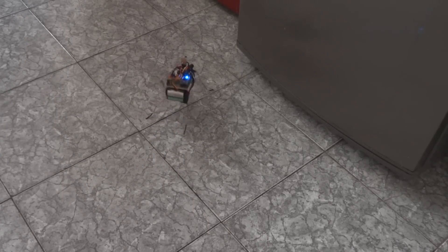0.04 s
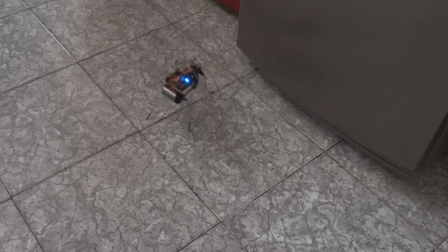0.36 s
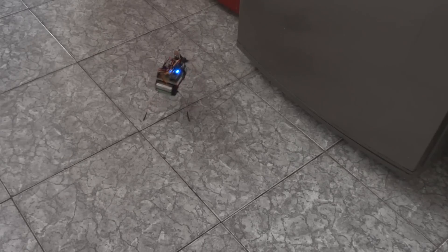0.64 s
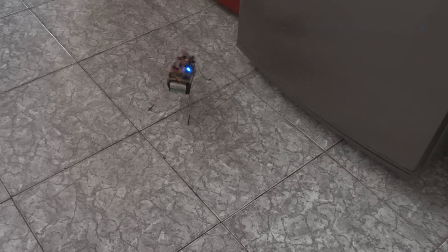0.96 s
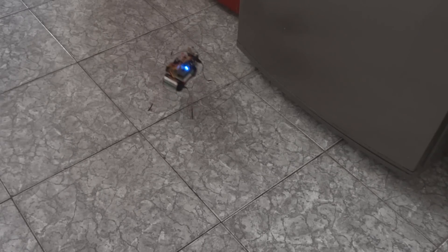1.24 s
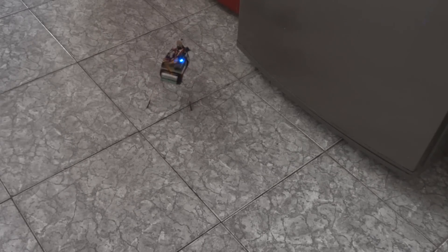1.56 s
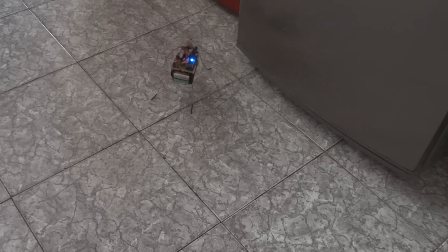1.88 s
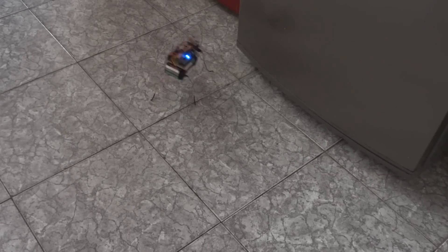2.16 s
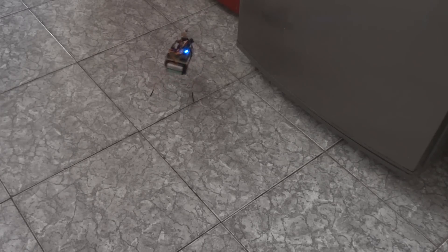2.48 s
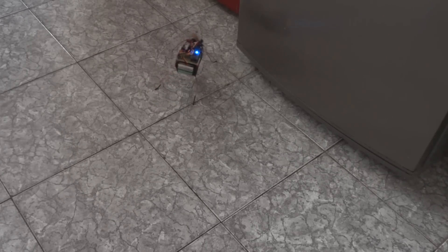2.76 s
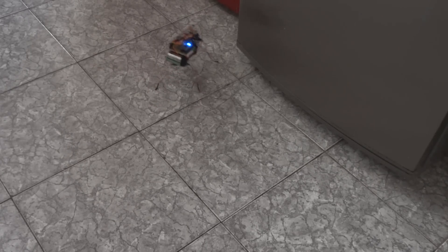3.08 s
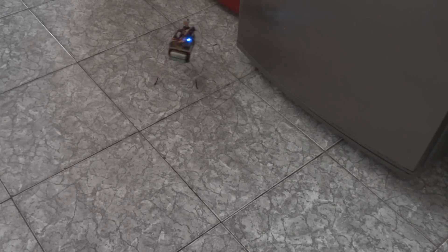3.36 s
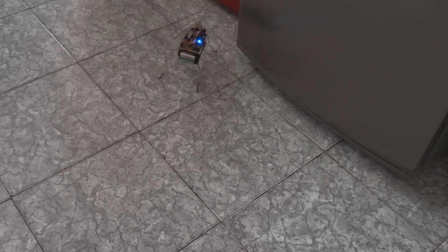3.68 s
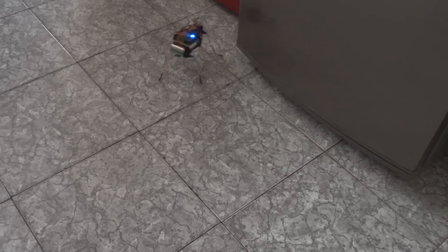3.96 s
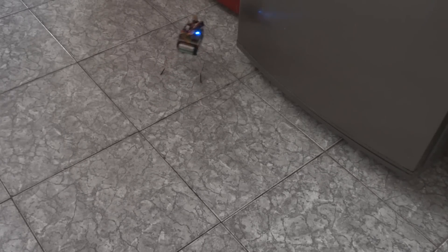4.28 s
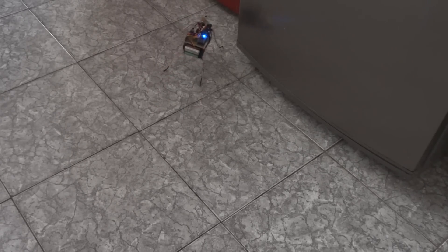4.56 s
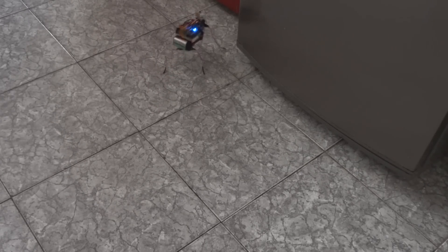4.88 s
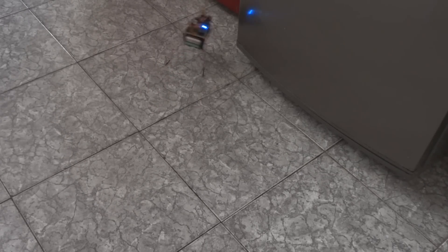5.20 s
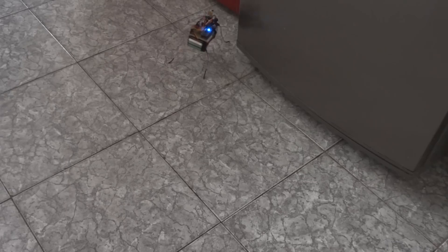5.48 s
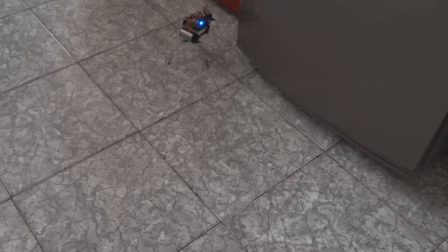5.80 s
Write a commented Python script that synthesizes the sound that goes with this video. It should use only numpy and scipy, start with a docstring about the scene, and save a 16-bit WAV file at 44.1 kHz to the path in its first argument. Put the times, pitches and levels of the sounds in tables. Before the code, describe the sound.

A little legged robot walks steadily over a tiled floor. Its small servo motors alternate between a clear, high whine and a rougher, hissing gear chatter, about two swings a second, each ending in a tiny chirp. The feet tap softly and sometimes scuff, and a leg clacks once late on. The microphone is fairly near, in a small room with quiet background air and a faint low hum.

```python
"""A little legged robot walks over a tiled floor, its servos taking turns: a clear whining lean,
then a rougher, hissing stride, each about 0.45 s long. Meshing gears sing, loose teeth rattle the
case, motor brushes hiss, and each swing brakes with a chirp. The feet tap and scuff the tiles
in a small room; behind are room noise, a low rumble and hum, and one faint far-off tone."""
import sys
import numpy as np
from scipy import signal
from scipy.fft import rfft, irfft, next_fast_len
from scipy.io import wavfile
from scipy.ndimage import uniform_filter1d

SR = 44100
rng = np.random.default_rng(int(sys.argv[2]) if len(sys.argv) > 2 else 0)


def store_pcm(level_fs):
    """Save levels as 16-bit WAV."""
    pcm = np.round(np.clip(level_fs, -1, 1) * 32767).astype(np.int16)
    wavfile.write(sys.argv[1], SR, np.atleast_2d(pcm).T)


N = 266364
TIME = np.arange(N) / SR
IDLE_HZ = 827.4  # motor speed as a lean starts and a stride ends; speeds are the basic gear order


def servos(coast_from_s=.3):
    """Leans and strides in turn, each braked at its end."""
    # leans: start t/s, spun-up f/Hz, crest after t/s, crest f/Hz, dip f/Hz,
    # then trims: whine level/dB, chatter level/dB, hiss level/dB
    leans = [(-.3, 980, .17, 1040, 980, 2, 1.5, 0.5), (.59, 930, 0.15, 1013, 960, 1, 1.5, 0.5),
             (1.46, 972, .17, 1035, 985, 1, 1, 1.5), (2.341, 954, 0.17, 1039, 1030, -3.5, 0.5, 0.5),
             (3.21, 958.6, .12, 980, 985, 1.5, 0.5, -0.5), (4.1, 1022, .17, 1033, 988, -3.5, 0.5, -0.5),
             (4.98, 1016, .15, 1041, 988, -0.5, 0.5, 0), (5.86, 1030, .12, 1046, 1008, -0.5, -0.5, 1.5)]
    # strides: start t/s, kick f/Hz, sag after t/s, sag f/Hz, rebound after t/s, rebound f/Hz,
    # late f/Hz, then trims: whine level/dB, chatter level/dB, hiss level/dB, load level/dB
    strides = [(.1, 1268, .175, 999, .235, 985, 949, -1, -1.5, 0.5, -1.5),
               (.98, 1243, 0.16, 1003, 0.22, 978, 939, 1, -1, -1, 0),
               (1.86, 1209, 0.15, 999, .26, 989, 938, -2, -0.5, -1, 1.5),
               (2.74, 1095, 0.14, 915, .26, 1062, 1035, -1.5, 1.5, -0.5, -1.5),
               (3.62, 1188, .14, 931, .25, 1007, 948, -1.5, 1, -1.5, -2.5),
               (4.5, 1174, 0.17, 934, .25, 1006, 912, -3, 1.5, -1.5, 0.5),
               (5.38, 1153, .14, 907, 0.24, 1048, 953, 2, 1.5, 0, -1.5)]
    # ends of the swings: t/s, racing level/dB, braking level/dB
    stops = [(.03, -49, -44), (.52, -55, -52), (.92, -46, -41), (1.385, -52, -49), (1.795, -50, -46),
             (2.27, -55, -53), (2.672, -42, -40), (3.13, -52, -55), (3.55, -44, -43), (4.03, -52, -48),
             (4.437, -40, -42), (4.89, -56, -57), (5.315, -50, -42), (5.79, -55, -56)]
    out = np.zeros(N)
    for start, *row in leans:
        add(out, start, lean(*row))
    for start, *row in strides:
        add(out, start, stride(*row))
        add(out, start + coast_from_s, coast())
    for row in stops:
        add(out, *brake(*row))
    return out


def lean(spun_hz, crest_s, crest_hz, dip_hz, whine_db, chatter_db, hiss_db):
    """The clear swing: the motor spins up to a crest, dips as the weight shifts, races to its stop."""
    # envelopes before trims: t/s, whine level/dB, chatter level/dB, frame load level/dB,
    # hiss level/dB, backlash roughness/0-1
    swing = [(0, -66, -55, -4, -69, 0.5), (.03, -55.5, -50.5, -5.5, -64, 0.33),
             (0.102, -47.5, -48.5, -4, -58, 0), (0.219, -47.5, -46.5, -7.5, -60.5, 0.03),
             (.29, -55, -47.5, -4.5, -52, 0.78), (0.351, -48.5, -49.5, -14.5, -58.5, 0.52),
             (.4, -63, -58, -21, -68, 1.14)]
    # colour of the gear case: f/Hz, level/dB
    case = [(1000, -23.5), (2700, -24), (3050, -25), (3400, -8.5), (4000, -7.5), (4500, -4.5), (5500, 15),
            (6300, 7.5), (7000, 11), (7700, 6.5), (8300, 6), (9700, -0.5), (16000, -22)]
    speeds = [(0, IDLE_HZ), (.05, spun_hz), (crest_s, crest_hz),
              (crest_s + .03485, dip_hz), (.26, dip_hz),
              (.315, 1120), (swing[-1][0], 916)]  # races, then brakes
    trims_db = (whine_db + .5, chatter_db + .5, 1, hiss_db + 1)
    return servo_swing(speeds, trims_db, swing, case, chatter_db_per_hz=.0268, flutter=.00796,
                       jitter_rad=.045, blur_rad=.29, twin_lead=.035, twin_db=-1.5, wobble=.25)


def stride(kick_hz, sag_s, sag_hz, rebound_s, rebound_hz, late_hz,
           whine_db, chatter_db, hiss_db, load_db):
    """The rough swing: the motor kicks off fast, sags as the leg takes the load, rebounds, runs down."""
    # envelopes before trims: t/s, whine level/dB, chatter level/dB, frame load level/dB,
    # hiss level/dB, backlash roughness/0-1
    swing = [(0, -53, -64, -20, -62, .93), (0.036, -50.5, -53.5, -8.5, -50, 0.98),
             (.1, -49.5, -48, 3, -48, 0.23), (.16, -45, -51, 4, -48, 0.24),
             (.25, -46.5, -52, 5.5, -46, 0.17), (.31, -50, -49.5, 3.5, -46, 0.52),
             (.4, -57, -49, -5, -52.5, .85), (.44, -63, -54, -3, -60, .85),
             (0.482, -70, -50.5, -18, -69, 0.82)]
    # colour of the gear case: f/Hz, level/dB
    case = [(1000, -36), (2650, -26), (3250, -1.5), (4100, 1.5), (4500, 1.5), (5500, 11.5), (6200, 5.5),
            (7000, 7.5), (7700, -2.5), (8300, 4.5), (9600, -4.5), (12000, -14), (16000, -41)]
    speeds = [(.025, kick_hz), (sag_s, sag_hz), (rebound_s, rebound_hz),
              (.32, late_hz), (swing[-1][0], IDLE_HZ)]
    trims_db = (whine_db - .5, chatter_db - .5, load_db, hiss_db + 1)
    return servo_swing(speeds, trims_db, swing, case, chatter_db_per_hz=.052, flutter=.00843,
                       jitter_rad=.053, blur_rad=.22, twin_lead=.02, twin_db=-6.5, wobble=.51)


def servo_swing(speeds, trims_db, swing, case, chatter_db_per_hz, flutter,
                jitter_rad, blur_rad, twin_lead, twin_db, wobble):
    """One swing along speeds (t/s, f/Hz): gears ring the case, the mesh whines, the brushes hiss."""
    times, *envelopes, backlash = np.transpose(swing)
    t = np.arange(0, times[-1] + .004, 1 / SR)
    size = len(t)
    whine_db, chatter_db, load_db, hiss_db = (
        np.interp(t, times, envelope) + trim for envelope, trim in zip(envelopes, trims_db))
    roughness = np.clip(np.interp(t, times, backlash), 0, 1)
    clean, rough = np.sqrt(1 - roughness), np.sqrt(roughness)
    # the gears chatter more the faster they turn, and the whine peaks on the resonance of the case
    speed = np.interp(t, *np.transpose(speeds))
    chatter_db += chatter_db_per_hz * (speed - 1000)
    whine_db += 9.5 * bell(5 * speed, hz=4920, width=190)
    # the controller hunts, and uneven teeth push the shaft ahead and behind
    speed *= 1 + flutter * drift(size, 41.9)
    angle = phase(speed) + jitter_rad * drift(size, 89)
    # a twin servo runs slightly faster
    twin_angle = angle + phase(speed * twin_lead * (1 + drift(size, 20)))
    orders = gear_orders(angle, twin_angle, twin_db, blur_rad)
    # loose teeth knock in clumps, tied to the turning shaft
    clumps = amp(1.7 * drift(size, 380)) * (1 + .3 * np.cos(angle))
    rattle = unit(clumps * rng.standard_normal(size))
    sound = amp(chatter_db) * gear_case(clean * orders + rough * rattle, case, load_db)
    # with backlash the resonance is rasped instead of sung
    rasp = steady(shape(rattle, lambda f: bell(f, hz=4983, width=412)))
    sound += amp(whine_db) * (clean * mesh_whine(angle, wobble) + rough * rasp)
    sound += amp(hiss_db) * brush_hiss(clumps)
    return sound * np.sqrt(signal.windows.tukey(size, .016 * SR / size))  # 8 ms fades


def gear_orders(angle, twin_angle, twin_db, blur_rad):
    """Orders 3 to 12 of two gear trains, wavering more the further they lie from the fourth."""
    size = len(angle)
    orders = np.zeros(size)
    for k in range(3, 13):
        waver = blur_rad * (k - 4) * drift(size, 170) + 2 * np.pi * rng.random()
        pair = np.cos(k * angle + waver) + amp(twin_db) * np.cos(k * twin_angle - waver)
        orders += amp(3.5 * drift(size, 57)) * pair
    beating_order = .35 * np.cos(3.9 * angle + drift(size, 60))
    return unit(orders) + beating_order


def gear_case(drive, colour, load_db):
    """The case colours the chatter; the frame answers below the gear mesh, more so under load."""
    gears = shape(drive, lambda f: amp(read(colour, f)))
    frame = shape(gears, lambda f: 1 / (1 + (f / 4550) ** 30))
    treble = shape(gears, lambda f: 1 - 1 / (1 + (f / 5500) ** 30))
    return steady(treble) + amp(load_db) * steady(frame)


def mesh_whine(angle, wobble):
    """The gear mesh sings on the fifth order with a fast throb, about 65 times a second."""
    throb = .5 * np.cos(angle / 15.5 + 2 * drift(len(angle), 25))
    flicker = wobble * np.tanh(drift(len(angle), 110))
    return steady((1 + throb + flicker) * np.cos(5 * angle))


def brush_hiss(clumps):
    """The motor brushes give a high hiss, grainy in step with the rattling teeth."""
    # colour of the hiss: f/Hz, level/dB
    colour = [(8000, -50), (10500, -19.5), (11200, -8.5), (11800, 1), (12300, 1), (12850, -7.5),
              (13450, -5), (14300, -21), (15800, -17)]
    grains = clumps * rng.standard_normal(len(clumps))
    return unit(shape(grains, lambda f: amp(read(colour, f))))


def coast(length_s=.16, width_hz=520):
    """Late in a stride the unloaded gears run free with a harsh, ragged buzz."""
    # partials of the buzz: f/Hz, level/dB
    partials = [(3620, -55), (7300, -53.5), (10750, -60.5), (14350, -63)]
    size = round(length_s * SR)
    rattle = amp(2 * drift(size, 300)) * rng.standard_normal(size)
    buzz = sum(amp(db) * unit(shape(rattle, lambda f: bell(f, hz, width_hz) ** 1.3))
               for hz, db in partials)
    return buzz * signal.windows.tukey(size, .8)


def brake(stop_s, race_db, brake_db, side_db=-10):
    """The gears race and brake: the mesh tone shoots up, then dives. Returns start time and chirp."""
    # glide of the gear mesh: t/s from the stop, f/Hz
    glide = [(-.065, 6600), (-.04, 7120), (-.022, 6920), (-.008, 5410), (.004, 4820), (.03, 4440)]
    times, hz = np.transpose(glide)
    t = np.arange(times[0], times[-1], 1 / SR)
    angle = phase(np.interp(t, times, hz) * (1 + .015 * drift(len(t), 300)))
    side_orders = np.cos(angle * 4 / 5) + np.cos(angle * 6 / 5)
    chirp = np.cos(angle) + amp(side_db) * side_orders
    ragged_db = np.interp(t, [-.025, -.005], [race_db, brake_db]) + 2.5 * drift(len(t), 200)
    return stop_s + t[0], amp(ragged_db) * chirp * signal.windows.tukey(len(t), .6)


def feet():
    """Everything the legs play on the tiles, each hit a third of a second at most."""
    t = np.arange(SR // 3) / SR
    return foot_taps(t) + foot_scuffs(t) + leg_clacks(t)


def foot_taps(t, trim_db=-8, attack_s=.00023, t60_s=.27):
    """A foot meets a tile: a dull, noisy thud with the leg's own pitch inside it."""
    # footfalls: t/s, level/dB before the trim, ring f/Hz, ring width/Hz
    footfalls = [(.158, -47, 376, 500), (.51, -41.5, 558, 231), (.86, -44.5, 490, 260),
                 (.86, -49, 926, 300), (1.015, -47.5, 584, 200), (1.38, -41, 550, 280),
                 (1.73, -43, 902, 514), (1.89, -47.5, 630, 207), (2.25, -43, 851, 700),
                 (2.752, -47, 656, 297), (3.125, -48.5, 556, 600), (3.511, -49, 944, 500),
                 (3.645, -46.5, 603, 220), (4.522, -45, 565, 217), (5.245, -45.5, 960, 281),
                 (5.77, -48, 960, 600)]
    out = np.zeros(N)
    attack = 1 - np.exp(-t / attack_s)
    for start, db, hz, width in footfalls:
        thud = shape(rng.standard_normal(len(t)), lambda f: bell(f, hz, width))
        ring = unit(steady(thud) + .9 * np.sin(2 * np.pi * hz * t))
        add(out, start, amp(db + trim_db - 60 * t / t60_s) * attack * ring)
    return out


def foot_scuffs(t):
    """A foot drags over a tile: a short swell of gritty midrange noise."""
    # drags: t/s, length/s, level/dB, centre f/Hz, width/Hz
    drags = [(1.913, 0.088, -55.5, 1650, 500), (2.236, 0.072, -58, 1960, 820),
             (4.709, 0.074, -56.5, 1730, 437), (5.759, 0.048, -59.5, 1700, 890)]
    out = np.zeros(N)
    for start, length, db, hz, width in drags:
        grains = rng.standard_normal(len(t)) * amp(2.2 * drift(len(t), 210))
        swell = np.sin(np.pi * np.minimum(t / length, 1))
        add(out, start, amp(db) * swell * unit(shape(grains, lambda f: bell(f, hz, width))))
    return out


def leg_clacks(t, t60_s=.24):
    """A leg clacks: a burst of noise dies away in its broad, bright modes."""
    # clacks: t/s, level/dB
    clacks = [(4.898, -42.5), (4.914, -47)]
    # modes of the leg: f/Hz, width/Hz, level/dB
    modes = [(1660, 1800, 1), (2350, 320, -22), (3000, 660, -14), (3860, 990, 14)]
    out = np.zeros(N)
    for start, db in clacks:
        noise = rng.standard_normal(len(t))
        ring = shape(noise, lambda f: sum(amp(gain) * bell(f, hz, width) for hz, width, gain in modes))
        add(out, start, amp(db - 60 * t / t60_s) * unit(ring))
    return out


def room(x, wet_db, early_db, likeness):
    """Early bounces off floor and furniture, then a stereo tail that dies band by band."""
    # decay of the room: f/Hz, t60/s
    decay = [(250, 0.21), (1000, 0.59), (4000, 0.46), (12000, 0.063)]
    size, echoes_per_s = SR // 2, 2500
    echoes = rng.standard_normal((3, size)) * (rng.random((3, size)) < echoes_per_s / SR)
    echoes[:, :SR // 150] = 0  # pre-delay
    hz, t, bands = signal.stft(echoes, SR, nperseg=256)
    tails = signal.istft(bands * amp(-60 * t / read(decay, hz)[:, None]), SR, nperseg=256)[1]
    tails /= np.linalg.norm(tails, axis=1, keepdims=True)
    # one tail common to both sides, plus one of its own for each
    response = amp(wet_db) * (np.sqrt(likeness) * tails[0] + np.sqrt(1 - likeness) * tails[1:])
    bounces = rng.integers(SR // 500, SR // 60, size=6)
    response[:, bounces] += amp(early_db) * rng.choice([-1, 1], size=6)
    response[:, 0] += 1  # direct sound
    return signal.fftconvolve(x[None], response / np.linalg.norm(response[0]), axes=1)[:, :N]


def far_tone(peak_s=1.7, peak_db=-51, fade_db_per_s=32):
    """A faint tone from far off swells and fades, blurred by the building."""
    # partials of the tone: f/Hz, relative level/dB
    partials = [(1067, -6), (1425, -13.5)]
    noise = rng.standard_normal((2, N))
    tone = shape(noise, lambda f: sum(amp(db) * bell(f, hz, width=32) for hz, db in partials))
    return amp(peak_db - fade_db_per_s * abs(TIME - peak_s)) * unit(tone)


def room_noise(level_db=-54.5):
    """A diffuse bed of air, wide in the mids and centred in the bass and treble."""
    # colour of the air: f/Hz, relative level/dB
    colour = [(20, -7), (53, -4), (108, -7), (230, -4.5), (373, -8), (545, -7), (800, -9), (1100, -8.5),
              (2400, -18), (3200, -17), (6000, -27), (15000, -23.5)]
    # stereo image: f/Hz, left-right correlation
    likeness = [(30, 1), (80, 0.85), (170, 0.7), (330, -0.12), (1200, -0.17), (2500, -0.092), (6000, 1)]
    mid, side = rng.standard_normal((2, N))
    mid = shape(mid, lambda f: amp(read(colour, f)) * np.sqrt(1 + read(likeness, f)))
    side = shape(side, lambda f: amp(read(colour, f)) * np.sqrt(1 - read(likeness, f)))
    return amp(level_db) * unit(np.array([mid + side, mid - side]))


def rumble_and_hum(hum_hz=65.1, trim_db=-2):
    """A deep rumble and a wavering hum rest low in the centre and swell now and then."""
    # swells of the rumble: t/s, half-length/s, level/dB before the trim
    rumble_swells = [(1.8, .15, -60), (3.58, 0.12, -57), (3.971, 0.11, -58.5), (5.25, 0.066, -53.5),
                     (5.72, 0.17, -62)]
    # swells of the hum: t/s, half-length/s, level/dB before the trim
    hum_swells = [(2.0, 0.17, -62), (3.499, 0.15, -55.5), (3.95, 0.31, -62.5), (4.62, 0.053, -58),
                  (4.95, 0.039, -58)]
    rumble = unit(shape(rng.standard_normal(N), lambda f: bell(f, hz=40, width=26)))
    hum = unit(np.sin(2 * np.pi * hum_hz * TIME + .97 * drift(N, 14)))
    return amp(trim_db) * (swelling(-70, rumble_swells) * rumble + swelling(-67.5, hum_swells) * hum)


def swelling(rest_db, swells):
    """A resting level with smooth swells on top."""
    return amp(rest_db) + sum(amp(db) * np.exp(-((TIME - s) / half) ** 2) for s, half, db in swells)


def amp(db):
    return 10 ** (np.asarray(db) / 20)


def phase(hz):
    return 2 * np.pi * np.cumsum(hz) / SR


def unit(x):
    return x / np.sqrt(np.mean(x ** 2) + 1e-20)


def steady(x):
    """Rides the gain to hold the short-term rms at 1."""
    return x / np.sqrt(abs(uniform_filter1d(x ** 2, size=1500)) + 1e-12)


def read(points, hz):
    """Reads a curve of (f/Hz, value) on a log-frequency axis."""
    f, value = np.transpose(points)
    return np.interp(np.log(hz + 1), np.log(f + 1), value)


def shape(x, gain):
    """Filters x by a function of frequency."""
    size = next_fast_len(x.shape[-1] + 1024)
    return irfft(rfft(x, size) * gain(np.fft.rfftfreq(size, 1 / SR)), size)[..., :x.shape[-1]]


def bell(f, hz, width):
    """Gain of a resonance with steep skirts."""
    return 1 / (1 + ((f - hz) / (.78 * width)) ** 2)


def drift(size, hz):
    """Random wander of rms 1, no faster than about hz."""
    return unit(shape(rng.standard_normal(size), lambda f: 1 / (1 + (f / hz) ** 4)))


def add(mix, s, sound):
    """Mixes in a sound that starts at time s, which may lie before zero."""
    at = round(s * SR)
    sound = sound[max(-at, 0):]
    part = mix[max(at, 0):][:len(sound)]
    part += sound[:len(part)]


def scene():
    """Servos and feet in the room, over the quiet background."""
    robot = room(servos(), wet_db=-9.5, early_db=-16, likeness=.65)
    robot += room(feet(), wet_db=-7.5, early_db=-16, likeness=.073)
    return robot + far_tone() + room_noise() + rumble_and_hum()


def record(dry):
    """A steep low-pass takes off the very top."""
    lowpass = signal.firwin(801, cutoff=15800, window=("kaiser", 9), fs=SR)
    return signal.oaconvolve(dry, lowpass[None], "same")


dry = scene()
out = record(dry)
store_pcm(out)
```